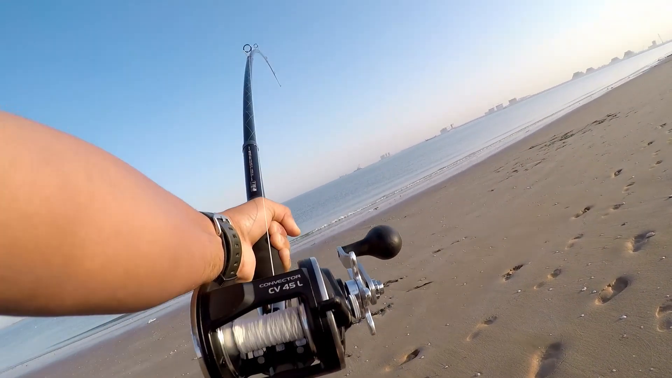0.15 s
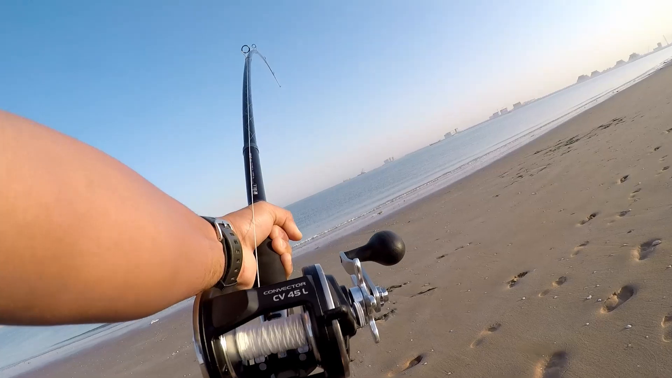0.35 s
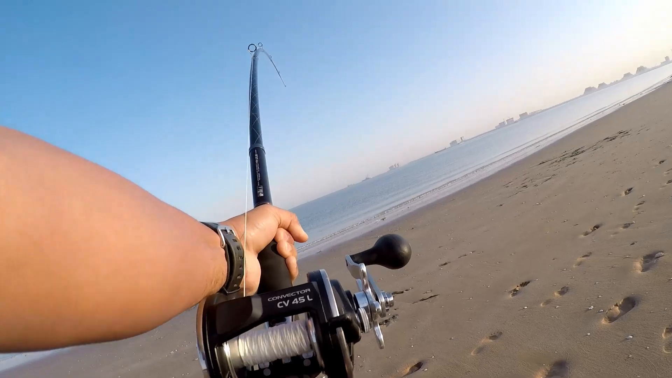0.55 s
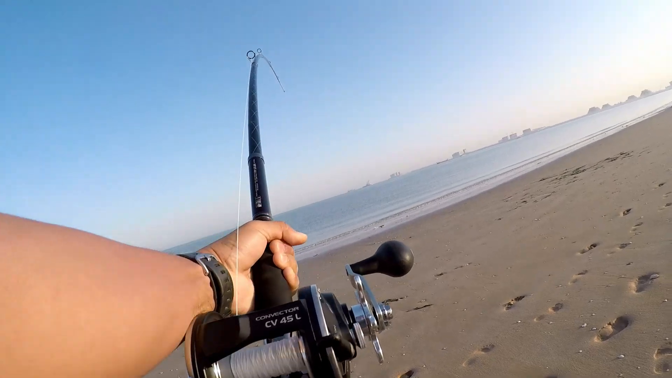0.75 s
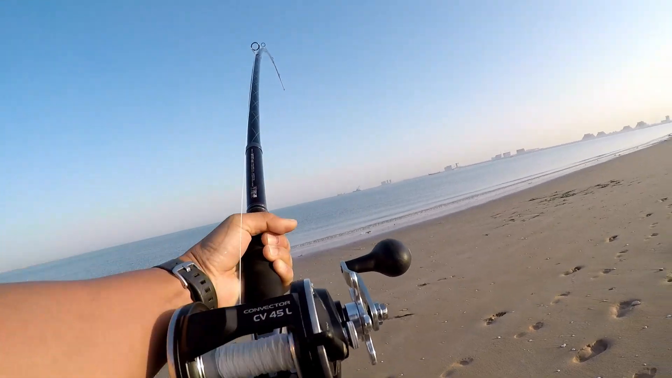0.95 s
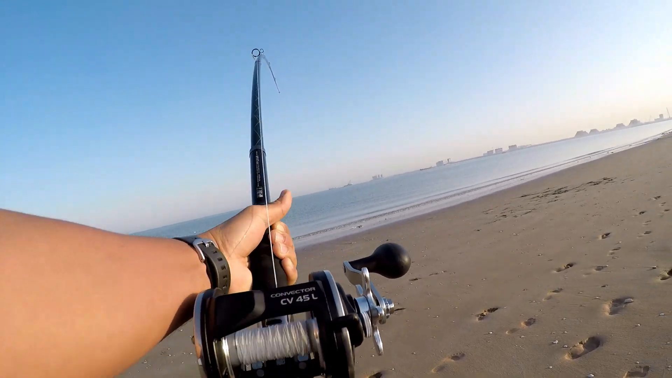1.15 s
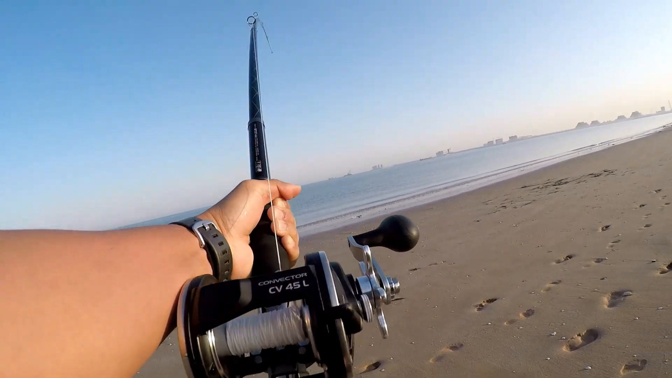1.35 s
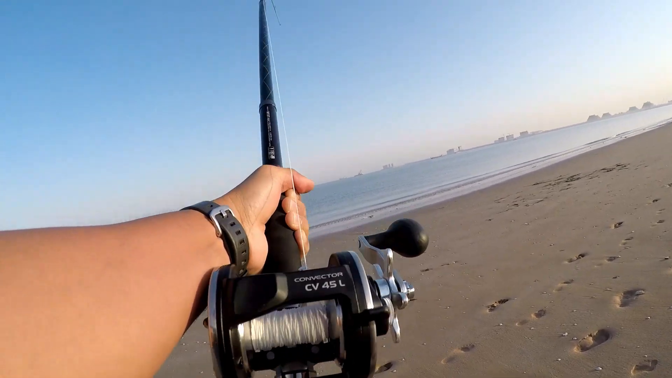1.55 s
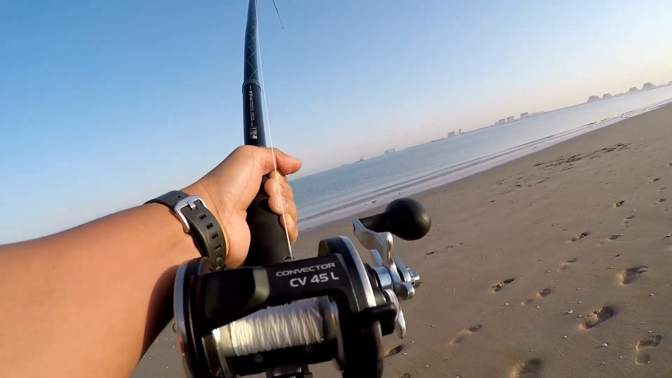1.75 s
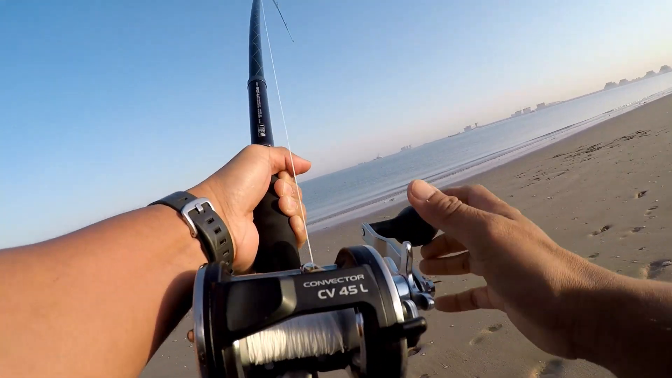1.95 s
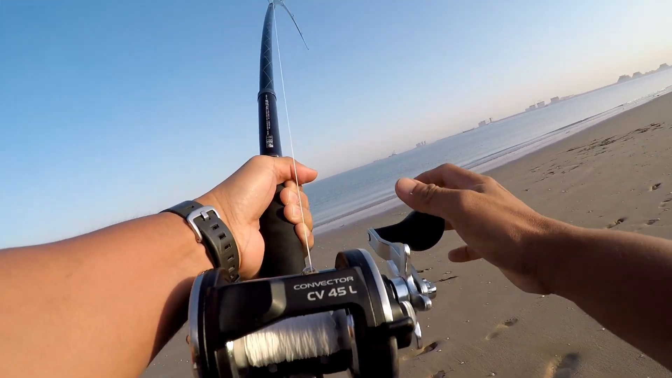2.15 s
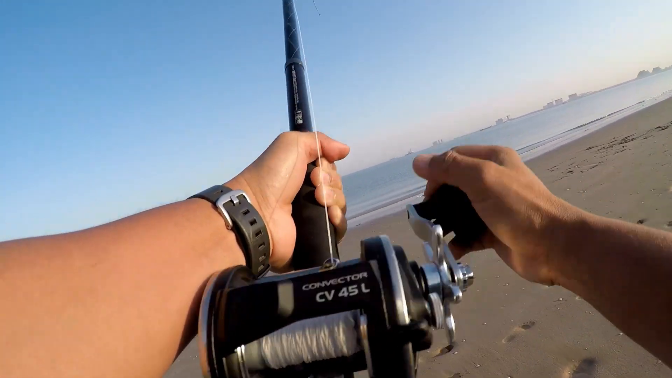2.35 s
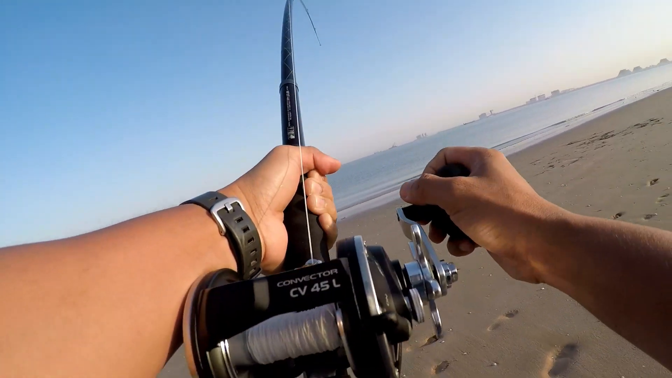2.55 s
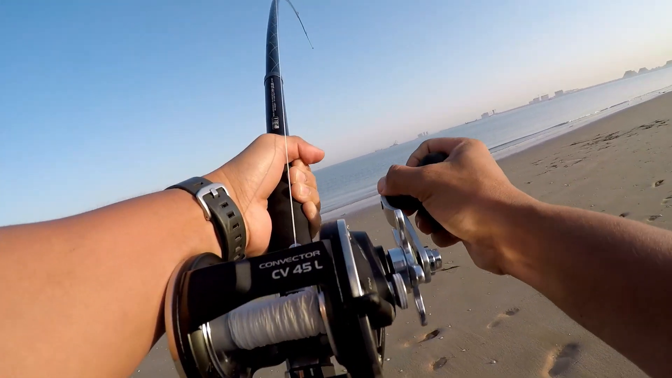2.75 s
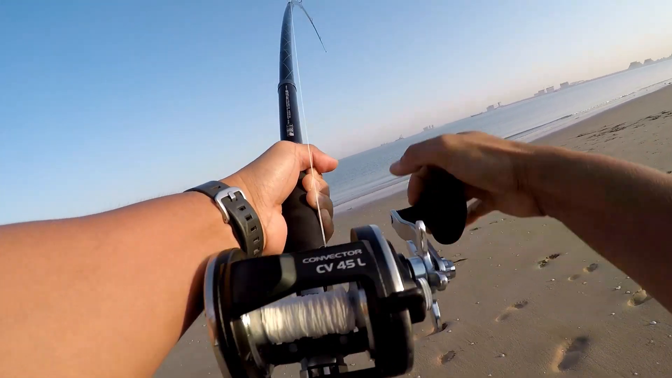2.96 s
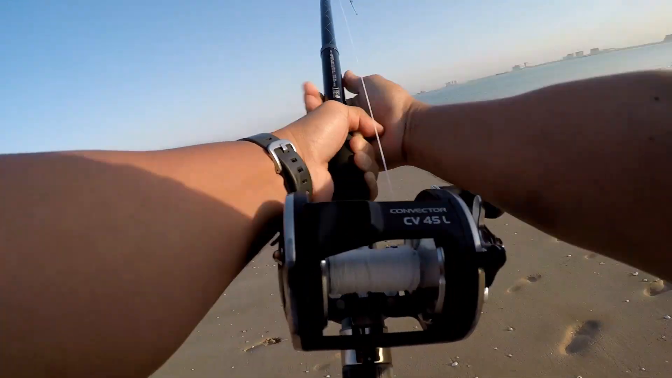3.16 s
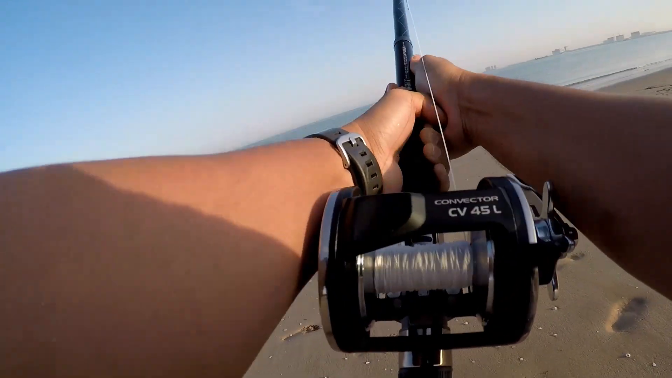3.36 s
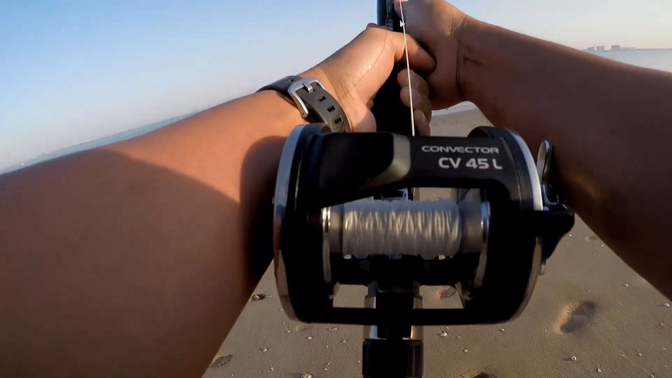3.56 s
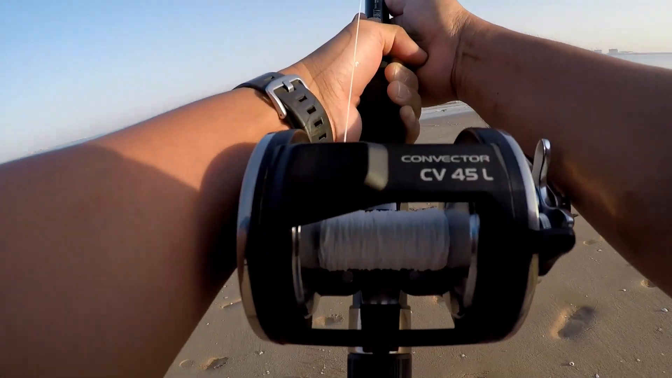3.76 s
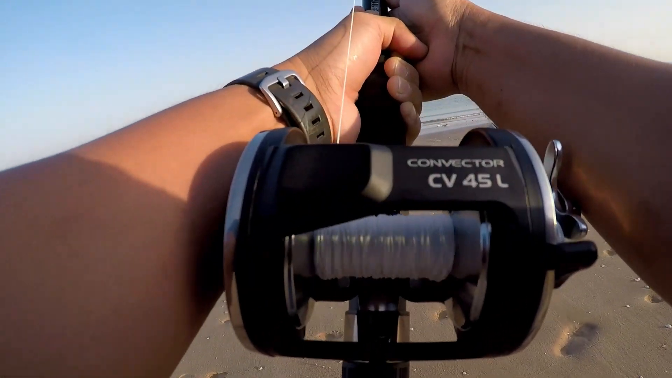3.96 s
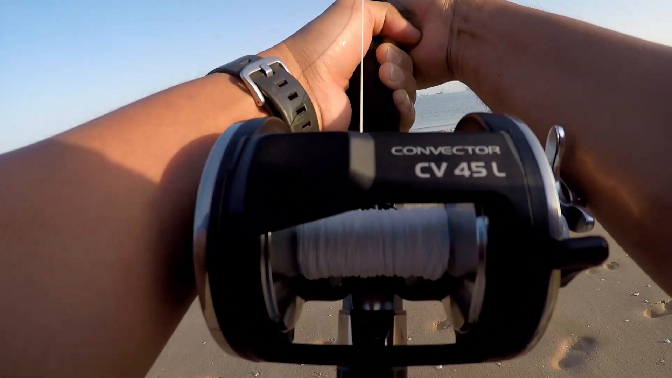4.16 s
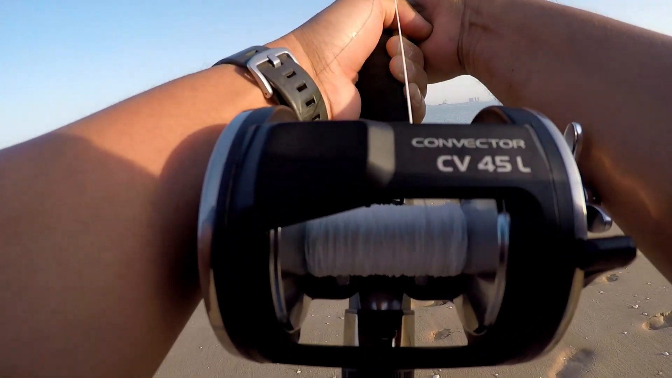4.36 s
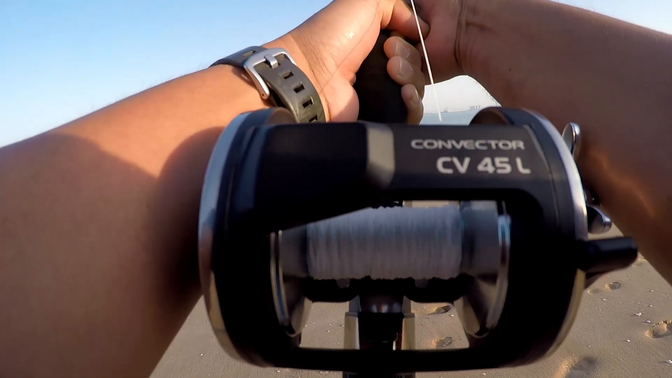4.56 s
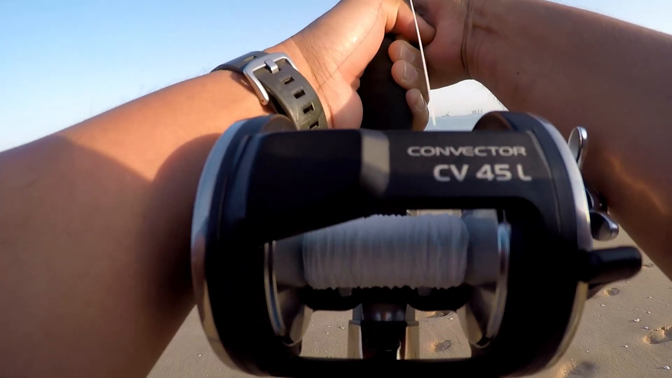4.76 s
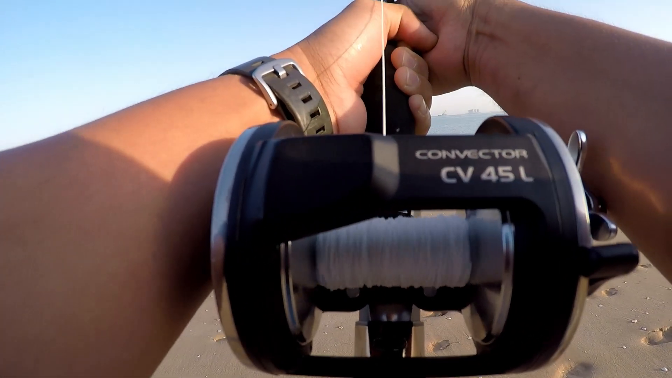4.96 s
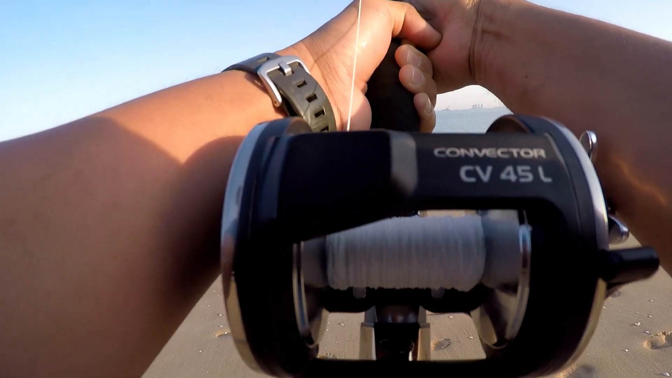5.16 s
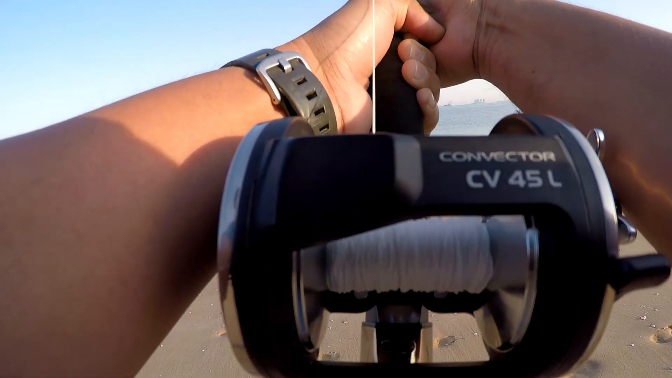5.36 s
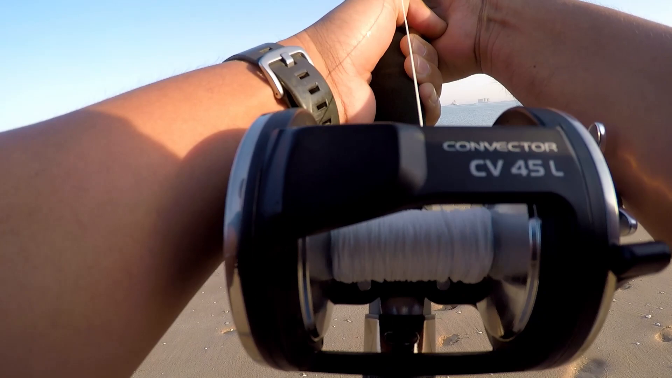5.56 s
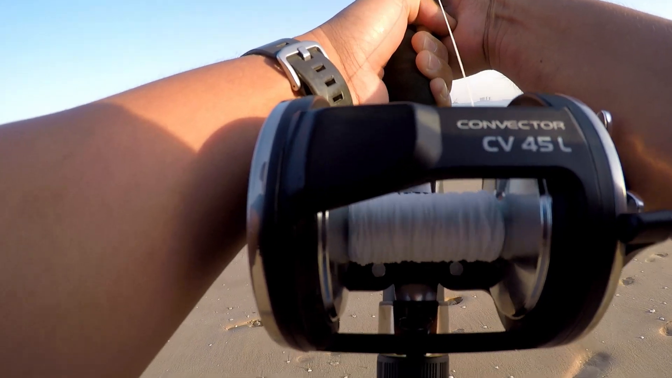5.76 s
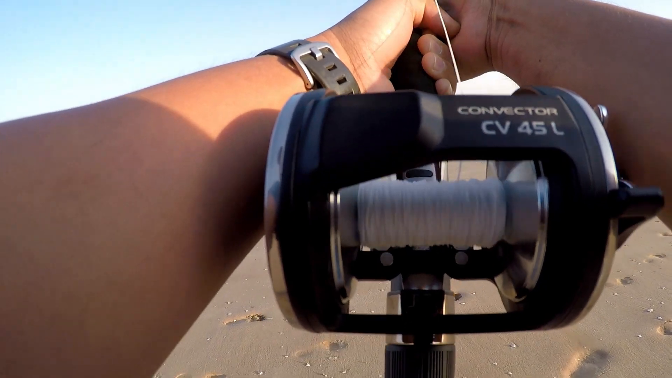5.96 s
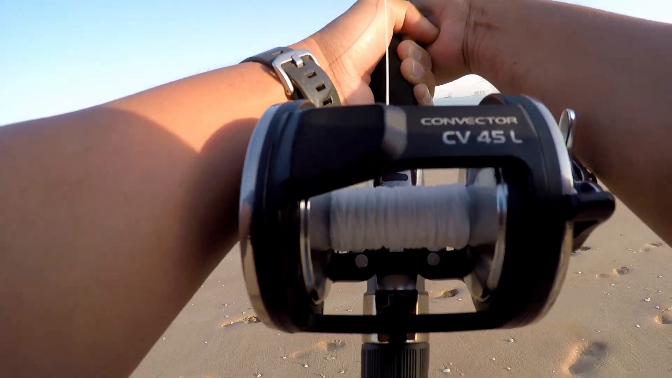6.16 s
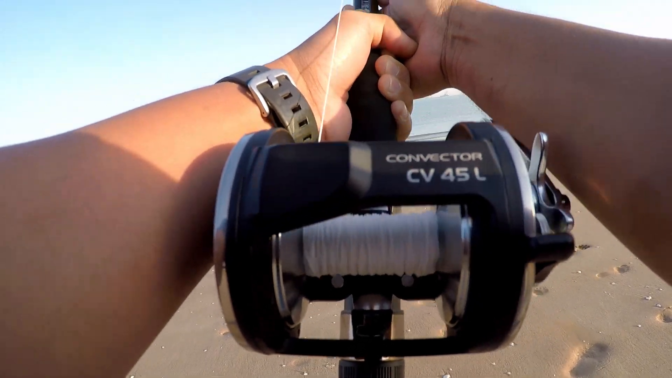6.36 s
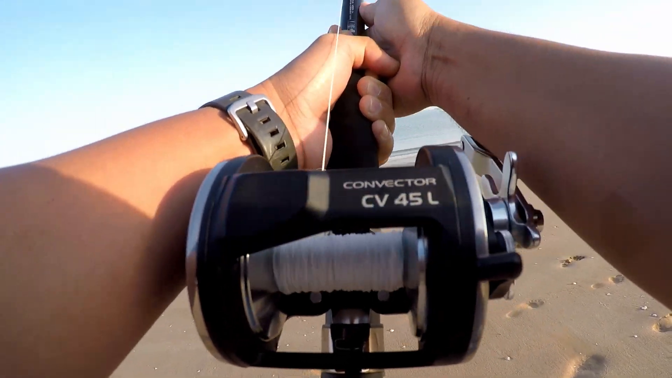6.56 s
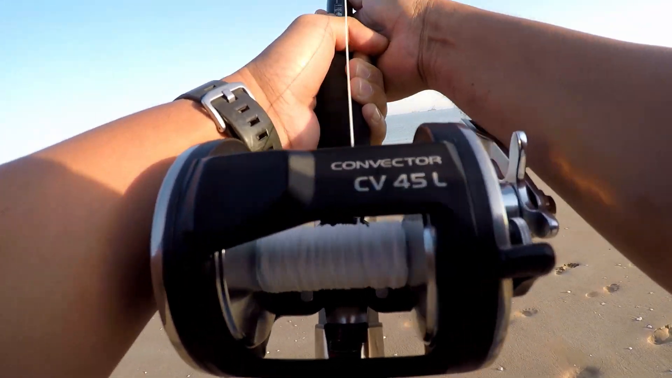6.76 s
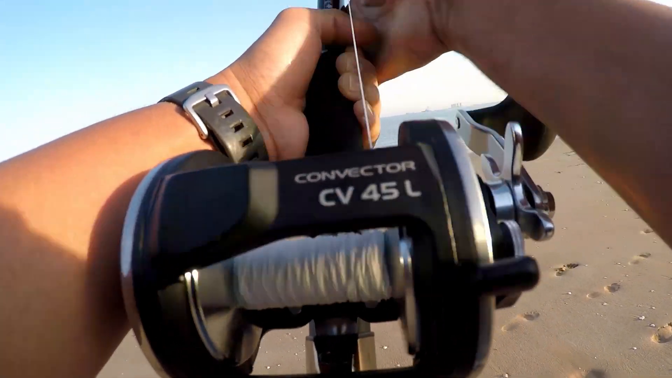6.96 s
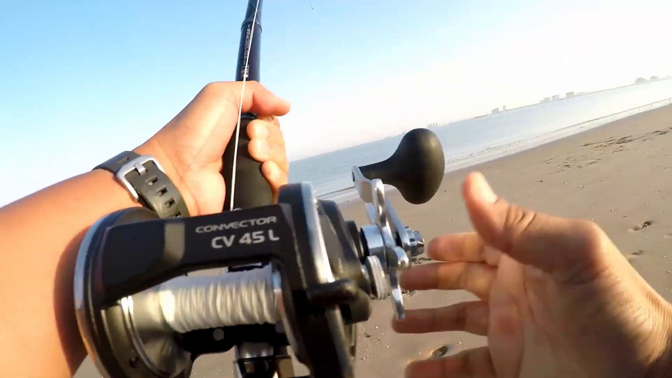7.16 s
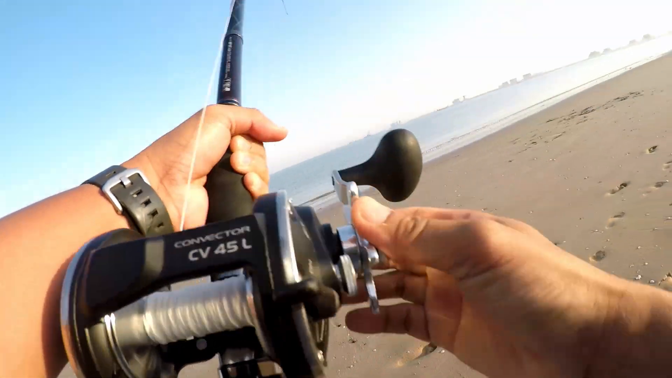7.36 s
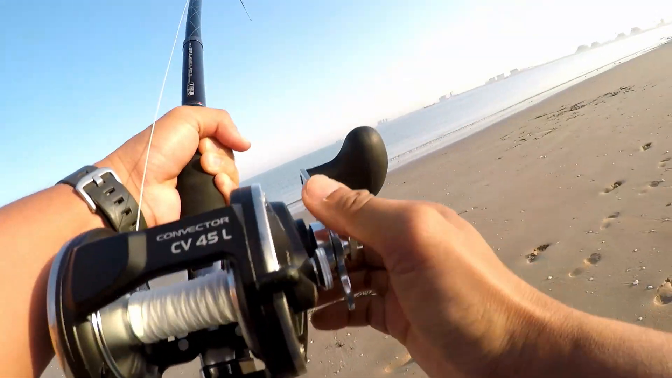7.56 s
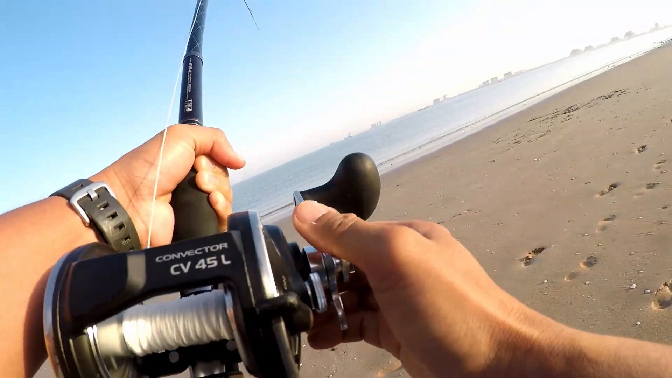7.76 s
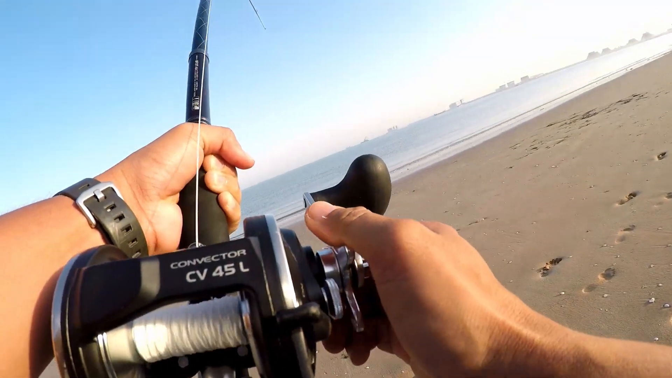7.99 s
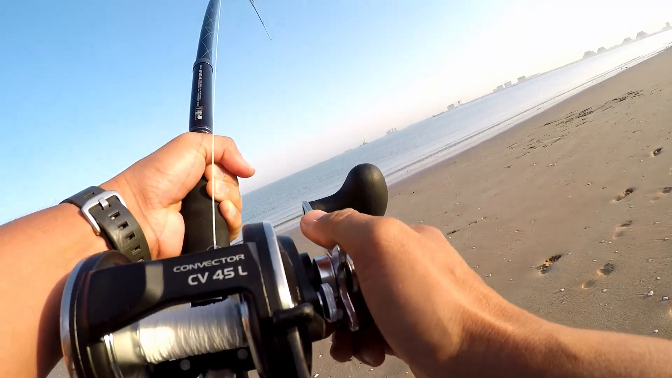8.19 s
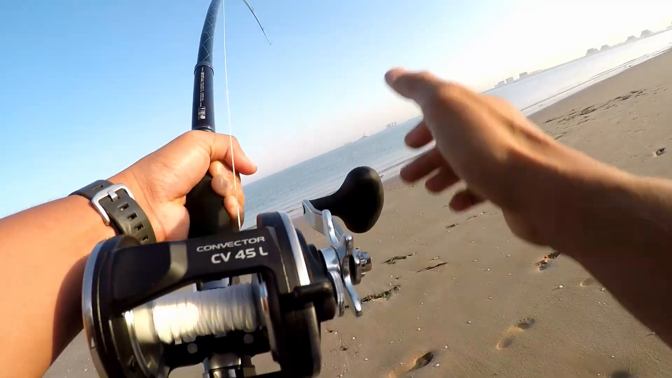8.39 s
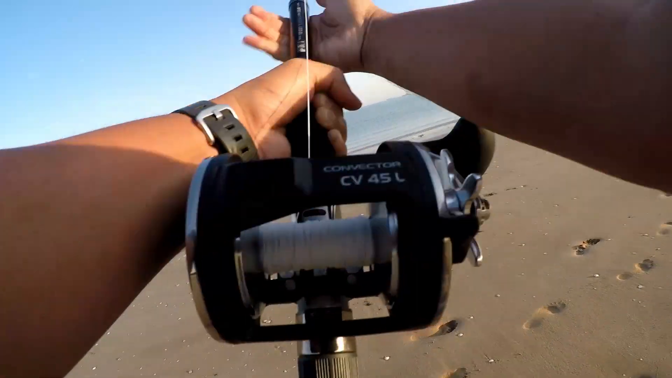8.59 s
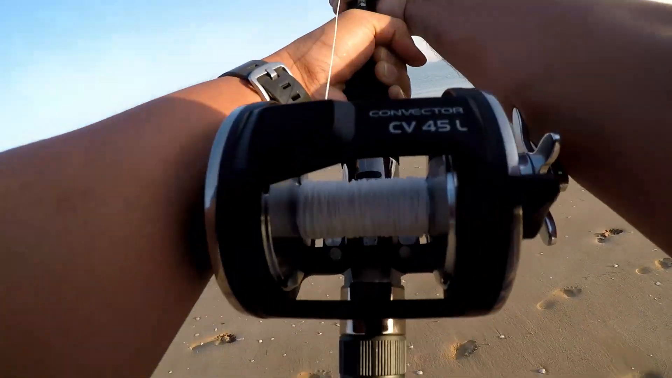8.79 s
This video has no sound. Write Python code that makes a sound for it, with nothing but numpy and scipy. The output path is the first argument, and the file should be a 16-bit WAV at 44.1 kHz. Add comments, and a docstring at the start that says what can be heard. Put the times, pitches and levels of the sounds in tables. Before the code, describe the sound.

Close ratcheting buzz of a fishing reel, pausing for slow clicks, then a long screaming run, over wind bumps and far-off waves on a beach.

```python
"""A fish pulls line off a big reel on a windy beach, just in front of a body-worn camera.
It opens on a ringing buzz: a sprung steel pawl snaps over the teeth of a running spool, louder with speed
and broken when the drag grabs. Gusts rumble on the microphone, the camera mount thuds, low surf washes far off.
The spool then creeps in single clicks while line hisses faintly, and a long run begins with a bright flare
and knocks of the mount. Near the end come a few more clicks and one last short run."""
import sys
import numpy as np
from scipy import signal
from scipy.fft import rfft, irfft, next_fast_len
from scipy.io import wavfile
from scipy.ndimage import uniform_filter1d, map_coordinates

SR = 44100
rng = np.random.default_rng(int(sys.argv[2]) if len(sys.argv) > 2 else 0)


def generate_wav(sig):
    """Save sig (samples, or channels by samples) to the path in sys.argv[1] as 16-bit PCM at SR."""
    pcm = np.round(np.clip(np.atleast_2d(sig).T, -1, 1) * 32767).astype(np.int16)
    wavfile.write(sys.argv[1], SR, pcm)


N = 389403
TIME = np.arange(N) / SR

# All levels are relative: the functions may add a trim in dB. "colour" tables give the level at each pitch.
# speed of the spool in each run, dipping wherever the drag grabs: (time_s, teeth_per_s)
FIRST_RUN = [(0.0, 408), (0.022, 376), (0.06, 524), (0.12, 485), (0.157, 528), (0.21, 413), (0.314, 379),
             (0.367, 324), (0.434, 375), (0.546, 375), (0.636, 461), (0.688, 300), (0.733, 361),
             (0.868, 242), (0.995, 398), (1.137, 299), (1.167, 370), (1.197, 332), (1.27, 344),
             (1.313, 150)]
LONG_RUN = [(3.247, 118), (3.274, 122), (3.293, 98), (3.326, 143), (3.347, 144), (3.363, 103), (3.378, 170),
            (3.445, 330), (3.48, 690), (3.525, 835), (3.59, 815), (3.71, 620), (3.755, 170), (3.79, 108),
            (3.83, 190), (3.87, 320), (3.921, 540), (3.959, 553), (4.003, 373), (4.138, 382), (4.176, 284),
            (4.235, 356), (4.393, 323), (4.452, 395), (4.51, 370), (4.566, 150), (4.61, 290), (4.642, 347),
            (4.679, 301), (4.709, 342), (4.732, 295), (4.777, 342), (4.814, 458), (4.964, 542),
            (5.009, 464), (5.113, 559), (5.233, 411), (5.285, 460), (5.36, 368), (5.473, 414), (5.495, 353),
            (5.667, 452), (5.69, 518), (5.729, 549), (5.76, 200), (5.82, 175), (5.882, 398), (5.934, 531),
            (6.046, 536), (6.106, 388), (6.173, 475), (6.308, 502), (6.338, 569), (6.383, 560),
            (6.413, 441), (6.533, 447), (6.555, 406), (6.637, 390), (6.705, 441), (6.869, 514),
            (6.914, 374), (6.952, 453), (6.997, 336), (7.116, 413), (7.169, 378), (7.214, 434),
            (7.251, 361), (7.476, 420), (7.498, 375), (7.565, 344), (7.61, 494), (7.67, 475), (7.73, 385),
            (7.85, 411), (7.94, 395), (8.089, 366), (8.14, 200), (8.164, 110)]
LAST_RUN = [(8.269, 165), (8.34, 190), (8.38, 430), (8.445, 712), (8.49, 625), (8.56, 590), (8.68, 452),
            (8.72, 475), (8.77, 370), (8.83, 190)]
RUNS = [FIRST_RUN, LONG_RUN, LAST_RUN]
# spool angle at the start of each run: (angle_radians)
START_ANGLES = [-2.3, 0, 0]
# parts of the buzz as the reel is turned and drawn near:
# (time_s, clatter_db, pawl_db, side_plate_db, spring_db, cage_db)
FACING = [(0, -21.5, -16, -31.5, -27.5, -25.5), (1.3, -19.5, -19, -36.5, -31, -29),
          (3.3, -19.5, -24.5, -30, -28, -20), (3.55, -21, -25.5, -44, -36, -27),
          (4.0, -19, -21, -39, -25, -27), (6.8, -20, -22.5, -39.5, -22, -23),
          (7.3, -21.5, -20.5, -45.5, -23.5, -37), (8.2, -22, -24, -39.5, -25.5, -57),
          (8.83, -22.5, -20.5, -40.5, -21, -25)]
# ringing notes of the pawl and its spring: (pitch_hz, level_db, fade_by_60_db_s)
PAWL = [(3805, 11.5, 0.065), (3740, 7.5, 0.028), (6680, -3.5, 0.054), (10740, -19.5, 0.023)]
# brief notes of the spring, each struck by one high spot on the wheel:
# (pitch_hz, level_db, fade_by_60_db_s, spool_angle_radians)
SPRING = [(7246, 7.5, 0.034, 0.45), (6710, 3.5, 0.057, 1.76), (5930, -4, 0.013, 4.4),
          (10620, -4.5, 0.018, 1.12), (13380, -16.5, 0.016, 2.8)]
# colour of the dead clatter of the frame: (pitch_hz, level_db)
FRAME = [(400, -28.5), (1000, -16), (2000, -9), (2950, -17.5), (3250, -18), (3600, 1), (4000, -17.5),
         (4350, 7), (4750, 0.5), (5400, 6), (5950, 13), (6450, 7), (7300, 11.5), (7650, 2.5), (7900, 3.5),
         (8400, -4), (10000, -5.5), (10700, 0), (11300, -17.5), (12300, -8), (15000, -32)]
# colour of the side plate: (pitch_hz, level_db)
PLATE = [(300, -42), (600, -5), (900, -4), (1300, -20), (1520, 8), (1780, 3), (2050, 13.5), (2350, 11),
         (2700, 8), (3000, 19), (3600, -47)]
# hollow note of the open cage round the spool: (pitch_hz, level_db)
CAGE = [(2900, -47), (3100, -18), (3330, -6), (3550, -2.5), (3750, 2), (4000, -17.5), (4600, -63)]
# bright flare as the spool races away in the long run: (time_s, level_db)
FLARE = [(3.15, -60), (3.27, -22), (3.54, -23.5), (3.72, -30), (3.9, -36)]
# colour of that flare: (pitch_hz, level_db)
FLARE_COLOUR = [(3600, -27), (4400, -1), (5050, 1.5), (5500, -22), (6400, 1), (8000, -30)]
# the slowly changing breeze on the microphone: (time_s, rumble_db, buffeting_db)
BREEZE = [(0, -38.5, -36.5), (1.3, -33, -43), (1.62, -35, -43.5), (1.85, -25.5, -36.5), (3.4, -30.5, -34),
          (3.8, -41.5, -48.5), (6.8, -44.5, -50), (7.6, -34.5, -48.5), (8.83, -44, -49)]
# gusts on top of it: (start_s, length_s, rumble_db, buffeting_db)
GUSTS = [(0.712, 0.21, -27, -45), (1.07, 0.29, -21.5, -26), (2.947, 0.21, -32, -36),
         (3.216, 0.37, -25, -70), (7.069, 0.19, -27.5, -36.5), (7.264, 0.27, -23, -41)]
# colours of the wind's deep rumble and quicker buffeting: (pitch_hz, level_db)
RUMBLE = [(12, 3), (28, -1), (90, -3.5), (130, -9.5), (220, -29), (600, -56)]
BUFFET = [(60, -0.5), (130, 2), (250, -3.5), (400, -11.5), (600, -16), (800, -24), (1500, -42.5),
          (4000, -96)]
# colour of the distant surf: (pitch_hz, level_db)
SURF = [(120, -9), (200, 5.5), (301, -27), (591, -3), (1120, -5), (1360, -1), (1440, -3.5), (6180, -46),
        (14000, -53)]
# knocks of handling: (start_s, peak_db, pitch_hz)
KNOCKS = [(3.233, -9.5, 69), (3.343, -17.5, 275), (3.439, -4.5, 64), (4.091, -25.5, 79.8),
          (4.706, -23, 61.5), (4.869, -21, 171), (5.064, -26, 148), (5.161, -28, 115.6), (6.476, -31, 164),
          (7.115, -20, 99.3), (8.558, -24, 123)]
# taut line sliding through the guides between runs: (time_s, level_db)
SLIDE = [(1.34, -38.5), (1.564, -42.5), (2.11, -32.5), (2.374, -36), (3.12, -31.5)]
# single teeth while the spool creeps:
# (start_s, strength_db, pawl_ring_db, flange_ring_db, side_plate_db, thin_note_db, thin_note_hz)
CLICKS = [(1.321, -14, -6, -22, -8, 5, 6860), (1.742, -34.5, -5, -10, 0, -10, 5600),
          (1.9041, -7, -5, -12, -2, -2, 5600), (1.945, -7, 0.5, -18, 3, -4, 6500),
          (1.9785, -6.5, 0, -16, 2, -2, 6600), (2.016, -7.5, 2, -20, 7, 3, 5060),
          (2.046, -8, 3, -18, 3, 1, 5040), (2.0762, -7, -2, -17, 2, 5, 5100),
          (2.105, -8, 3, -19, 8, 2, 7200), (2.1324, -8.5, 4, -18, 5, 5, 7120),
          (2.6662, -6, 1, -2, 5, 6, 6530), (2.833, -5, -6, -4, 4, 5, 6670),
          (2.9923, -3.5, -12, -6, 1, -3, 6360), (3.1385, -5, -18, -2, -5, -7, 6330),
          (3.1812, -3.5, -17, -1, -2, -10, 6250), (3.218, -5.5, -6, -2, 2, 6, 7020),
          (3.237, -7.5, -6, 4, -4, 13, 6700), (8.1698, -12.5, -2, -14, -13, 9, 6920),
          (8.1883, -9, -7, -7, -7, 0, 4550), (8.2075, -10, -7, -14, -16, 13.5, 7500),
          (8.22, -10, -8, -14, -9, 4, 7400), (8.2314, -9, -10, -12, -15, -1, 4600),
          (8.246, -15, -10, -14, -8, 16, 6870), (8.262, -7, -12, -14, -10, 0, 7000)]
# colour of a lone drop of the pawl: (pitch_hz, level_db)
CLACK = [(400, -31), (1000, -9), (2500, -20.5), (3100, 3.5), (3700, -3), (4100, -5), (4700, 12),
         (5500, -3.5), (6500, 7.5), (7400, -2), (8400, -15), (10600, -10), (12300, -20), (15000, -24)]
# notes of the spool flange, heard only in the single clicks: (pitch_hz, level_db, fade_by_60_db_s)
FLANGE = [(4720, -9, 0.15), (4950, 0, 0.02), (6440, -2, 0.025), (6860, -7, 0.061), (7483, -20, 0.05),
          (10790, -22, 0.11), (13210, -30, .12)]
# notes of the pawl's tip in a crisp landing: (pitch_hz, level_db, fade_by_60_db_s)
TIP = [(4530, -3, 0.0085), (7200, -1, 0.027)]
# a hollow in the reel's colour that shifts as it is turned: (time_s, pitch_hz, depth_db)
HOLLOW = [(1.3, 2835, 13), (3.7, 2770, 0), (3.9, 1820, 4.5), (6.8, 2050, 4), (7.3, 2070, 8)]
# the reel at the two microphone ports:
# (pitch_hz, left_lead_radians, left_minus_right_db, likeness_0_to_1)
PORTS = [(900, -1.7, 0, .4), (1500, -1.5, 1.5, .5), (2100, -.2, 2.5, .8), (3000, 0, 0, .93),
         (3800, -.35, 1.5, .95), (4400, 0, 0, .98), (5000, -.2, 0, .85), (5400, -.6, -2, .6),
         (6100, -1.4, -4.5, .4), (6800, -1.9, 2.5, .4), (7400, -2.1, 0, .3), (8000, -2.2, -6, .1),
         (8800, -2.5, -10, .1), (10600, -1.7, -5, .2), (13000, -1.3, -3, .1)]
# how close the reel is held, scaling the lead and level difference: (time_s, factor)
CLOSENESS = [(0, 0.48), (3.1, 0.032), (3.8, 1.08), (8.8, 1.04)]

TEETH = 18  # on the spool
CRUISE_TEETH_PER_S = 400  # speed at which the buzz is neither raised nor lowered
CLATTER_DB_PER_OCTAVE, PAWL_DB_PER_OCTAVE, PLATE_DB_PER_OCTAVE = 2, 3, 4  # growth per doubling of speed
# the drag grips unevenly: a surge once a turn and a random judder, as shares of the speed
SURGE, JUDDER = .022, .015
# the pawl lands a little early or late, by an amount that comes and goes
JITTER_S, JITTER_SWING_DB = .0000088, 4
CHATTER = .26  # loose chatter of the pawl, mixed with its clean strike
PLATE_WHINE, PLATE_RATTLE, WHINE_FLICKER_DB = .65, .42, 5  # even whine, loose rattle, whine coming and going
SPRING_WAVER = .009  # sets how far the spring's notes bend
GUST_RISE_SHARE = 0.2  # of its length
SURF_DB = -56.5
# thuds keep an even beat, and are heavier in a stronger breeze
FIRST_THUD_S, THUD_EVERY_S = 0.179, 0.3198
THUD_DB, THUD_AT_BREEZE_DB, THUD_DB_PER_BREEZE_DB = -33.5, -46, 1.0039
# a tooth that follows the last within this time has a shorter swell before its thin note
# and less scrape, and lands more crisply
CREEP_S = .034
EDGE_HZ = 15300  # top of the final band


def gain_of(db):
    """Turns decibels into a multiplier."""
    return 10 ** (np.asarray(db) / 20)


def evened(x):
    """Scales a sound to an rms (average strength) of 1."""
    return x / np.sqrt(np.mean(x ** 2) + 1e-20)


def steadied(x, size=4400):
    """Holds the rms near 1 over a sliding window of size samples; faster throbs stay."""
    power = np.atleast_2d(x ** 2).mean(0)
    return x / np.sqrt(abs(uniform_filter1d(power, size)) + 1e-5 * np.mean(x ** 2))


def read(points, hz):
    """Reads a table's columns at any pitch, on a logarithmic pitch axis."""
    f, *columns = np.transpose(points)
    return [np.interp(np.log(hz + 1), np.log(f + 1), c) for c in columns]


def follow(rows, t=TIME):
    """Reads a table's columns along time."""
    s, *columns = np.transpose(rows)
    return [np.interp(t, s, c) for c in columns]


def coloured(x, points):
    """Filters a sound to a colour table."""
    size = next_fast_len(x.shape[-1] + 2048)
    level_db = read(points, np.fft.rfftfreq(size, 1 / SR))[0]
    return irfft(rfft(x, size) * gain_of(level_db), size)[..., :x.shape[-1]]


def drift(per_s):
    """A smoothly wandering random curve of rms 1, with per_s new points a second."""
    knots = np.arange(0, TIME[-1] + 1, 1 / per_s)
    return evened(np.interp(TIME, knots, rng.standard_normal(len(knots))))


def paired(two, likeness):
    """Blends two unrelated signals into two ports that are partly alike."""
    size = next_fast_len(N, True)
    a, b = rfft(two, size)
    c = np.clip(likeness, 0, 1)
    return irfft(np.array([a, c * a + np.sqrt(1 - c ** 2) * b]))[:, :N]


def noise_pair(likeness):
    """White noise for two ports, partly alike."""
    return paired(rng.standard_normal((2, N)), likeness)


def impulses(s, sizes):
    """Places a very short pulse at the exact time of each blow, even between samples."""
    at = np.floor(s * SR).astype(int)[:, None] + np.arange(-5, 7)
    away = at - s[:, None] * SR
    shape = np.sinc(away) * np.sinc(away / 6)
    return np.bincount(np.clip(at, 0, N).ravel(), (sizes[:, None] * shape).ravel(), N + 1)[:N]


def ring(blows, modes, size=6000):
    """Blows set dying notes ringing; such small parts radiate almost no bass."""
    t = np.arange(size) / SR
    note = sum(gain_of(db - 60 * t / t60) * np.cos(2 * np.pi * hz * t) for hz, db, t60 in modes)
    note = note * np.minimum(t / .0004, 1)  # a soft start
    band = signal.butter(5, [3300, 15000], "band", fs=SR, output="sos")
    return signal.oaconvolve(blows, signal.sosfilt(band, note))[:N]


def rattle(blows, grit, rise_s, size=700):
    """Each blow opens a brief burst of gritty noise, as the pawl chatters on the tooth."""
    u = np.arange(size) / SR / rise_s
    power = (u * np.exp(-u)) ** 2
    return grit * np.sqrt(abs(signal.oaconvolve(blows ** 2, power / power.sum())[:N]))


def knocking(rise_s, size=900):
    """Countless short notes of the frame smear one strike over a few ms, nearly even in pitch."""
    u = np.arange(size) / SR / rise_s
    z = rfft(rng.standard_normal(size) * u * np.exp(-u))
    flat = irfft(z / (abs(z) + .3 * np.mean(abs(z))), size)
    return flat * signal.windows.tukey(2 * size, .3)[size:]  # fade the end


def smeared(s, sizes, angle, count=3):
    """The frame answers a little differently at each angle of the spool."""
    shares = [np.maximum(np.cos(angle - 2 * np.pi * k / count), 0) for k in range(count)]
    return sum(signal.oaconvolve(impulses(s, sizes * share), knocking(rise_s=0.0015))[:N] for share in shares)


def speed(run):
    """Teeth per second in one run; zero outside it."""
    return follow(run)[0] * (TIME >= run[0][0]) * (TIME <= run[-1][0])


def loudness(rate, db_per_octave, stop_s):
    """Gain that grows with the speed of the spool and dies away when it stops."""
    gain = (rate > 0) * gain_of(db_per_octave * np.log2(np.maximum(rate, 1) / CRUISE_TEETH_PER_S))
    keep = np.exp(-1 / (stop_s * SR))
    return signal.lfilter([1 - keep], [1, -keep], gain)


def wavering(x, share):
    """Bends the pitch up and down at random by shifting the sound in time."""
    shift = share * SR / 42 * drift(30)
    return map_coordinates(x, [np.arange(N) + shift], order=3)


def teeth(run, start_angle, uneven_s=.000008, chance_db=1.42, stumble=0.0428):
    """Times, sizes and spool angles of the strikes in one run, counted from its speed."""
    rate = speed(run)
    t, rate = TIME[rate > 0], rate[rate > 0]
    surge = SURGE * np.sin(2 * np.pi * np.cumsum(rate) / SR / TEETH)
    rate = rate * (1 + surge + JUDDER * drift(170)[:len(t)])
    passed = np.cumsum(rate) / SR + .5
    k = np.arange(1, int(passed[-1]) + 1)
    s = np.interp(k, passed, t)
    pace = np.interp(s, t, rate)
    place = rng.standard_normal(TEETH)[k % TEETH]  # no two teeth are cut alike
    late, luck = rng.standard_normal((2, len(k)))
    # a slow spool stumbles from tooth to tooth
    stumble_s = stumble / pace * np.interp(pace, [150, 320], [1, 0])
    jitter_s = stumble_s + JITTER_S * gain_of(JITTER_SWING_DB * np.interp(s, TIME, drift(12)))
    sizes = gain_of(chance_db * luck) / np.sqrt(pace)
    return s + uneven_s * place + jitter_s * late, sizes, start_angle + 2 * np.pi * k / TEETH


def buzz(grit, likeness, plate_db=-3.0, zing_db=1.5, throb_db=5.0):
    """Rapid strikes merge; the pawl swells when a harmonic of the tooth rate sweeps through its notes."""
    s, sizes, angle = np.concatenate([teeth(*each) for each in zip(RUNS, START_ANGLES)], axis=1)
    rate = sum(speed(run) for run in RUNS)
    clatter_db, ring_db, hollow_db, spring_db, open_db = follow(FACING)
    strikes = paired([smeared(s, sizes, angle), smeared(s, sizes, angle)], likeness)
    strikes = strikes + CHATTER * rattle(impulses(s, sizes), grit, rise_s=0.00099)
    frame = gain_of(clatter_db) * steadied(coloured(strikes, FRAME), size=1500)
    flare = gain_of(follow(FLARE)[0]) * steadied(coloured(strikes, FLARE_COLOUR))
    # side plate and cage answer every tooth more alike, so their whine shows the speed
    even = signal.oaconvolve(impulses(s, sizes), knocking(rise_s=0.0011))[:N]
    whine = PLATE_WHINE * steadied(even) * gain_of(WHINE_FLICKER_DB * drift(20))
    plate = steadied(coloured(whine + steadied(strikes) + PLATE_RATTLE * grit, PLATE))
    plate = gain_of(plate_db + hollow_db) * plate
    cage = gain_of(open_db) * steadied(coloured(even + 0.21 * strikes, CAGE))
    # the slightly oval wheel lifts the pawl higher twice a turn
    lifts = impulses(s, sizes * gain_of(throb_db * np.cos(2 * angle)))
    pawl = gain_of(ring_db) * steadied(ring(lifts, PAWL), size=8000)
    # once a turn each high spot makes the spring zing
    loose = s + .000015 * rng.standard_normal(len(s))
    zings = 0
    for *mode, at in SPRING:
        high_spot = np.exp(9.4 * np.cos(angle - at))
        zings = zings + ring(impulses(loose, sizes * high_spot), [mode])
    zings = gain_of(zing_db + spring_db) * steadied(wavering(zings, SPRING_WAVER))
    return (loudness(rate, CLATTER_DB_PER_OCTAVE, stop_s=0.00032) * (frame + flare + cage + zings)
            + loudness(rate, PAWL_DB_PER_OCTAVE, stop_s=0.0017) * pawl
            + loudness(rate, PLATE_DB_PER_OCTAVE, stop_s=0.001) * plate)


def gear(gear_db=-63.0, turns_per_tooth=0.735, db_per_octave=18.0):
    """The gear train hums below the tooth rate, clearly only when the spool races."""
    rate = sum(speed(run) for run in RUNS)
    hum = np.sin(2 * np.pi * turns_per_tooth * np.cumsum(rate) / SR)
    return gain_of(gear_db) * loudness(rate, db_per_octave, stop_s=0.002) * hum


def gust(start, length):
    """A gust swells quickly and ebbs more slowly."""
    rise = np.interp(TIME, [start, start + GUST_RISE_SHARE * length, start + length], [0, 1, 0])
    return np.sin(np.pi / 2 * rise)


def wind(buffet_db=5.0, lumpy_db=4.0, flutter_db=3.0):
    """Breeze and gusts make lumpy eddies on the ports: a deep rumble and a quicker buffeting."""
    gusts = sum(gain_of(dbs)[:, None] * gust(s, length) for s, length, *dbs in GUSTS)
    low, high = gain_of(follow(BREEZE)) + gusts
    wide, small = noise_pair(.55), noise_pair(.2)  # wide eddies reach both ports more alike
    rumble = steadied(coloured(wide, RUMBLE)) * low * gain_of(lumpy_db * drift(22))
    buffet = steadied(coloured(small, BUFFET)) * high * gain_of(buffet_db + flutter_db * drift(45))
    return rumble + buffet


def surf():
    """Small waves far down the beach: coloured noise, swelling gently."""
    swell = gain_of(1.5 * drift(1.5))
    return evened(coloured(noise_pair(0.91), SURF)) * gain_of(SURF_DB) * swell


def bump(s, peak_db, hz, rise_s):
    """A soft push that swings back and forth as it dies."""
    out = np.zeros(N)
    start = round(s * SR)
    t = TIME[:min(SR // 4, N - start)]
    push = gain_of(peak_db) * t / rise_s * np.exp(1 - t / rise_s)
    out[start:][:len(t)] = push * np.sin(2 * np.pi * hz * t)
    return out


def mount(thud_hz=36, chance_db=3.5):
    """Evenly timed thuds and scattered knocks, carried through the camera mount."""
    beats = np.arange(FIRST_THUD_S, TIME[-1], THUD_EVERY_S)
    stronger_db = follow(BREEZE, beats)[0] - THUD_AT_BREEZE_DB
    peaks_db = THUD_DB + THUD_DB_PER_BREEZE_DB * stronger_db + chance_db * rng.standard_normal(len(beats))
    thuds = sum(bump(s, db, thud_hz, rise_s=0.014) for s, db in zip(beats, peaks_db))
    return thuds + sum(bump(s, db, hz, rise_s=0.0024) for s, db, hz in KNOCKS)


def line(slide_db=-11.5):
    """A faint hiss of line creeping through the guides between the first two runs."""
    colour = [(2000, 13.5), (4200, 7.0), (6100, 12.0), (7200, -0.5), (14000, -18.5)]  # (pitch_hz, level_db)
    hiss = evened(coloured(noise_pair(1.0), colour))
    between_runs = (TIME > FIRST_RUN[-1][0]) * (TIME < LONG_RUN[0][0])
    return hiss * gain_of(follow(SLIDE)[0] + slide_db) * between_runs


def thin_note(s, db, hz, creep, swell_s=0.006, fade_s=0.0047, size=4000):
    """A thin, rough note that swells up to each click and fades after it."""
    t = (np.arange(size) - size // 2) / SR
    roughness = .15 * np.cumsum(rng.standard_normal(size))
    tone = np.sin(2 * np.pi * hz * t + roughness)
    swell = np.exp(np.minimum(t / (swell_s * creep), -t / fade_s))
    out = np.zeros(N)
    out[round(s * SR) - size // 2:][:size] = gain_of(db) * tone * swell
    return out


def clicks(grit, scrape_db=9.0, snap_db=18.0, ring_db=-19.5, flange_db=-14.5, note_db=-17.0,
           drop_s=0.0039, plate_db=-7.5, crisp_db=4.5):
    """A lone tooth: a thin note swells, then the pawl scrapes, drops and rings out."""
    s, peak_db, own_ring_db, own_flange_db, own_plate_db, own_note_db, note_hz = np.transpose(CLICKS)
    creep = np.minimum(np.diff(s, prepend=0) / CREEP_S, 1) ** 2  # 1 when the tooth stands alone
    level_db = peak_db + note_db + own_note_db
    notes = sum(thin_note(*row) for row in zip(s + drop_s, level_db, note_hz, creep))
    scrape = gain_of(scrape_db) * rattle(impulses(s, gain_of(peak_db) * creep), grit, rise_s=0.0013)
    landings = impulses(s + drop_s / 2, gain_of(peak_db) * (1 - creep))
    crisp = gain_of(crisp_db) * rattle(landings, grit, rise_s=0.00063)
    drops = impulses(s + drop_s, gain_of(peak_db) * np.sqrt(creep))
    snap = gain_of(snap_db) * signal.oaconvolve(drops, knocking(rise_s=0.00018))[:N]
    plate_blows = impulses(s, gain_of(peak_db + plate_db + own_plate_db))
    plate = coloured(rattle(plate_blows, grit, rise_s=0.0025), PLATE)
    pawl = ring(impulses(s + drop_s, gain_of(peak_db + ring_db + own_ring_db)), PAWL)
    flange = ring(impulses(s + drop_s, gain_of(peak_db + flange_db + own_flange_db)), FLANGE)
    clack = coloured(scrape + crisp + snap, CLACK)
    return notes + clack + plate + pawl + flange + ring(landings, TIP)


def reel(hollow_width_hz=210):
    """The reel reaches the two ports with a lead and a shading that follow how close it is held."""
    likeness = read(PORTS, np.fft.rfftfreq(next_fast_len(N, True), 1 / SR))[2]
    grit = noise_pair(likeness)
    # split into short slices of time and pitch
    hz, t, z = signal.stft(buzz(grit, likeness) + clicks(grit) + gear(), SR, nperseg=512)
    hollow_hz, depth_db = follow(HOLLOW, t)
    z = z * gain_of(-depth_db * np.exp(-((hz[:, None] - hollow_hz) / hollow_width_hz) ** 2))
    lead, balance_db, _ = read(PORTS, hz)
    # half of each difference goes to the left, half to the right
    side = np.array([1, -1])[:, None, None] * follow(CLOSENESS, t)[0] / 2
    shade = gain_of(side * balance_db[:, None])
    z = z * shade / np.sqrt((shade ** 2).mean(0)) * np.exp(1j * side * lead[:, None])
    return signal.istft(z, SR, nperseg=512)[1][:, :N]


def scene():
    """The reel close by, in open air with no echo."""
    return reel() + wind() + surf() + mount() + line()


def record(dry):
    """The camera rounds off the tallest peaks, then cuts the highest treble."""
    rounded = dry / (1 + (dry / .93) ** 6) ** (1 / 6)
    treble_cut = signal.firwin(255, EDGE_HZ, window=("kaiser", 9), fs=SR)
    return signal.oaconvolve(rounded, treble_cut[None], "same")


dry = scene()
out = record(dry)
generate_wav(out)
```